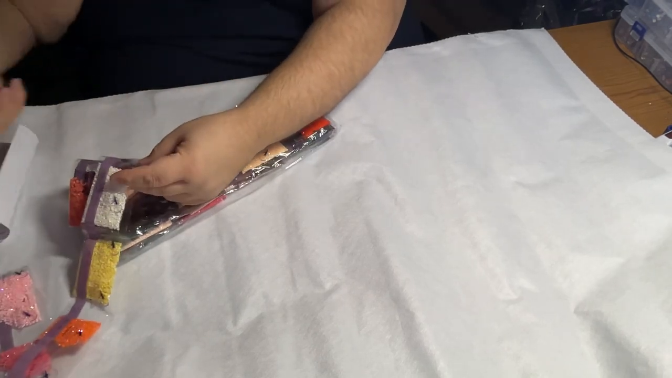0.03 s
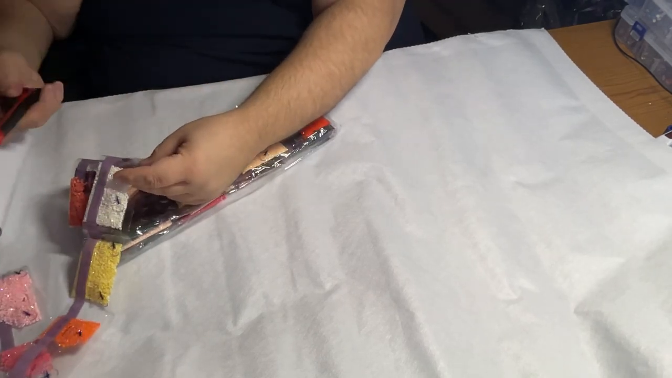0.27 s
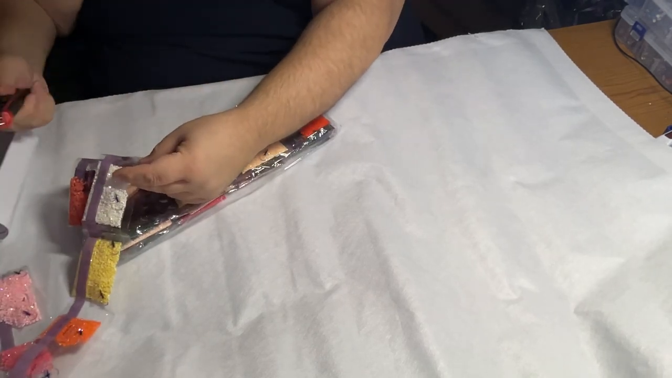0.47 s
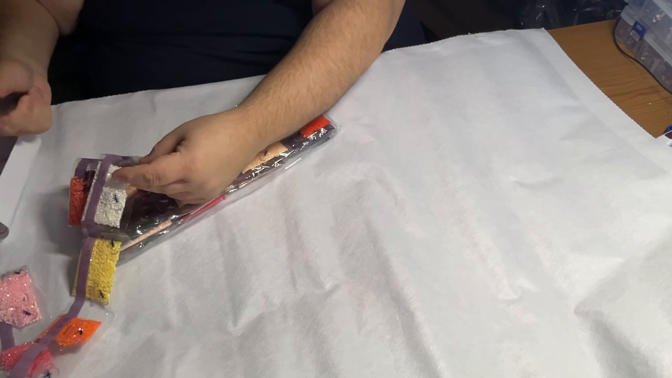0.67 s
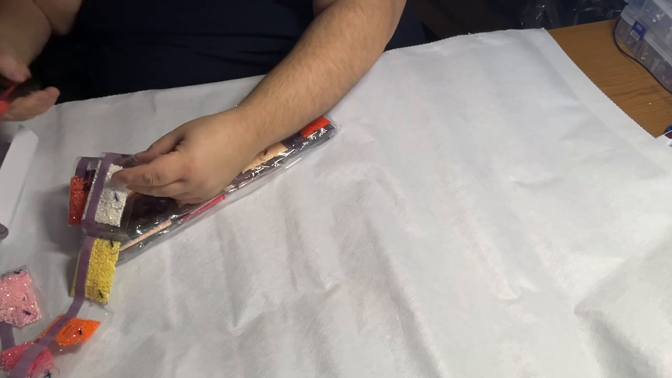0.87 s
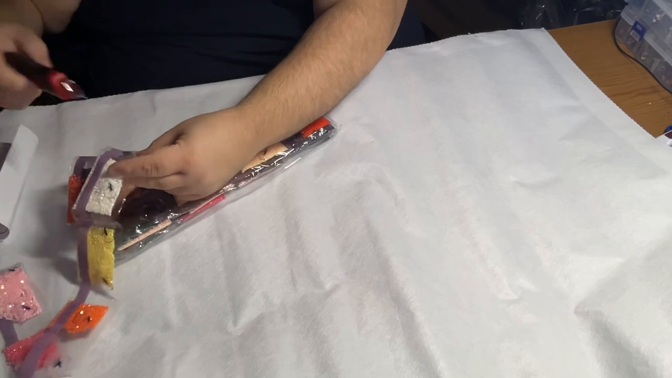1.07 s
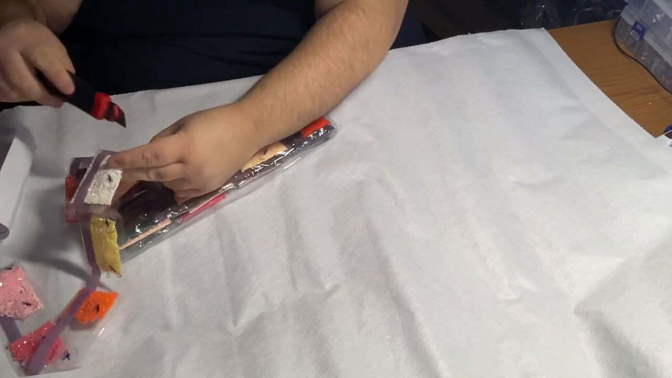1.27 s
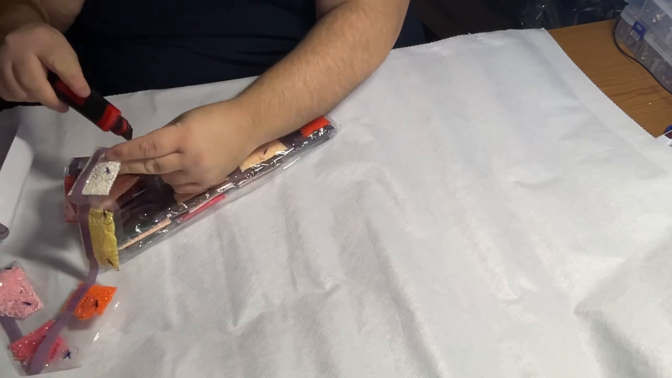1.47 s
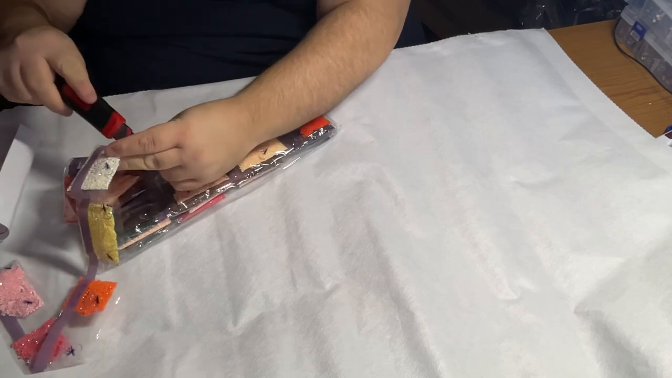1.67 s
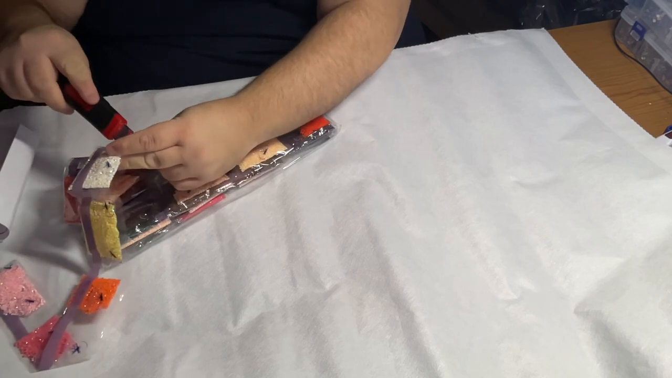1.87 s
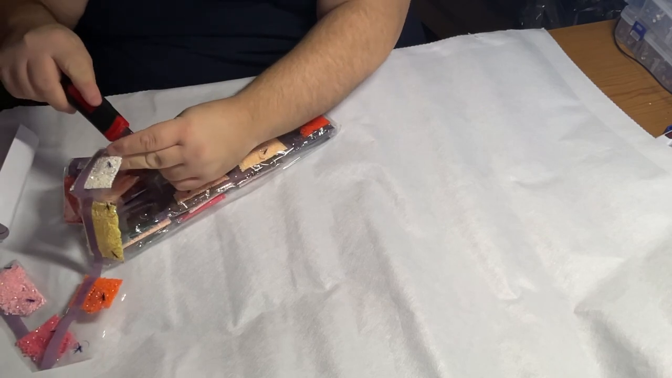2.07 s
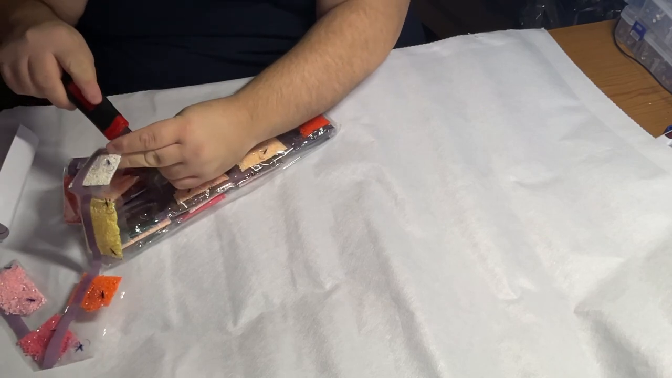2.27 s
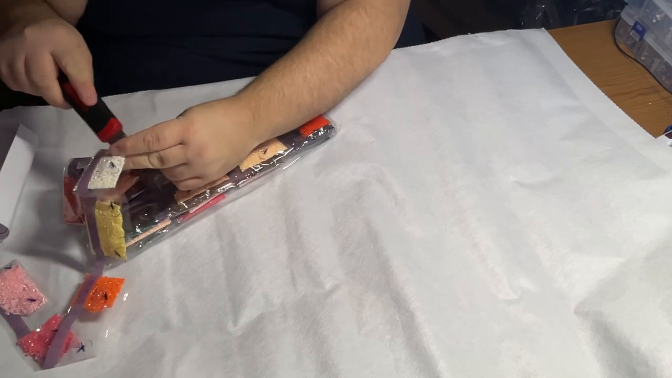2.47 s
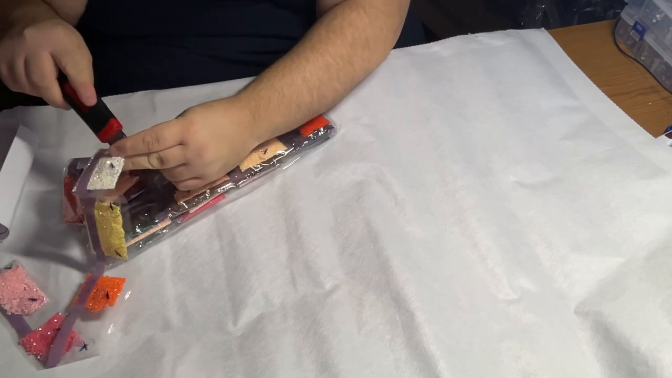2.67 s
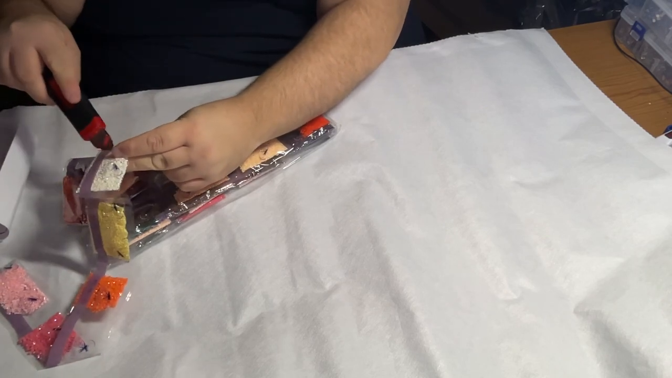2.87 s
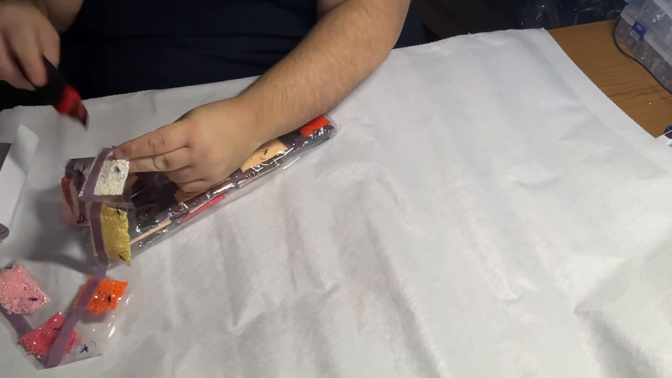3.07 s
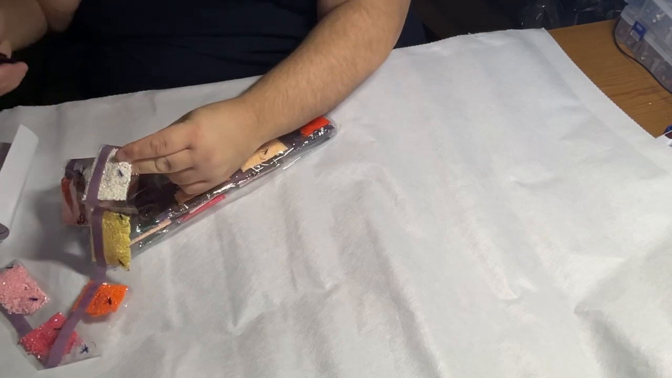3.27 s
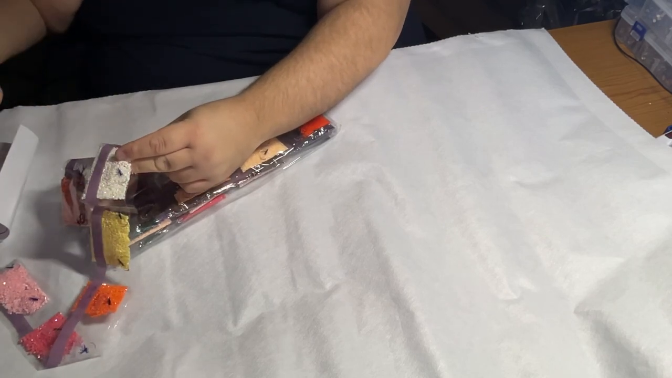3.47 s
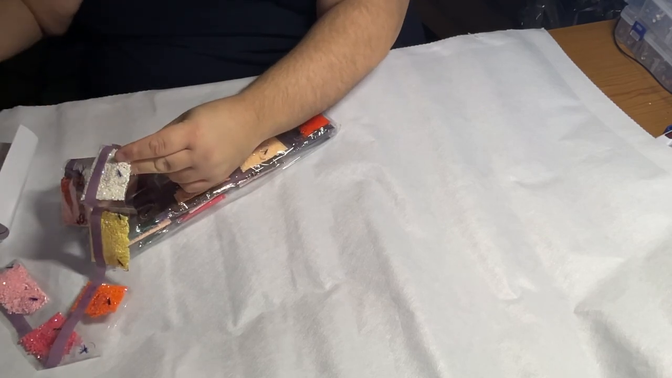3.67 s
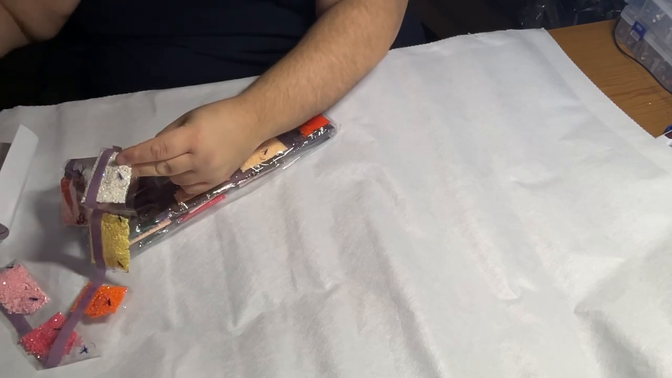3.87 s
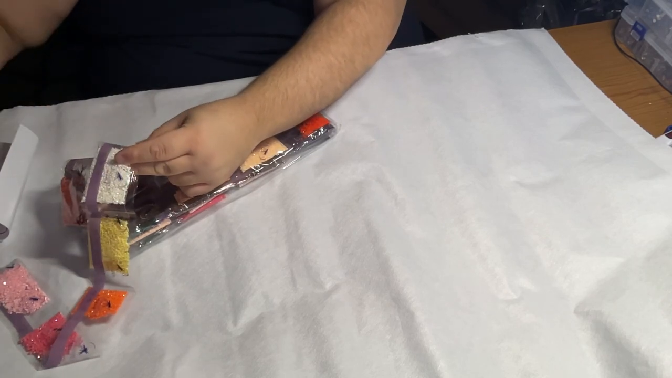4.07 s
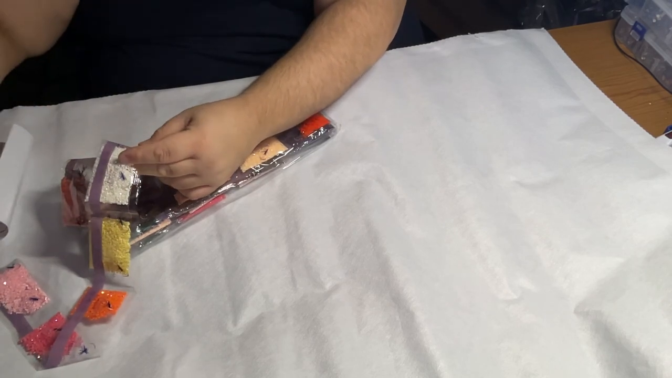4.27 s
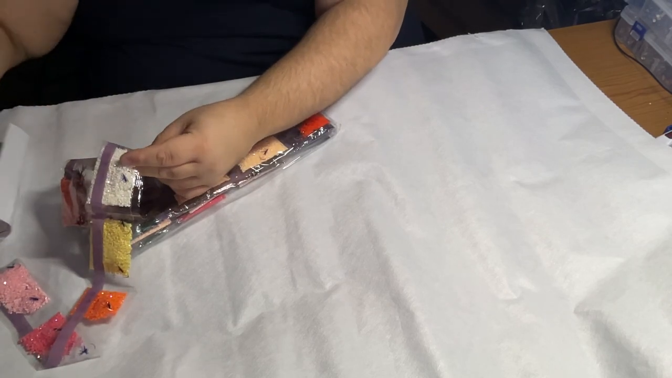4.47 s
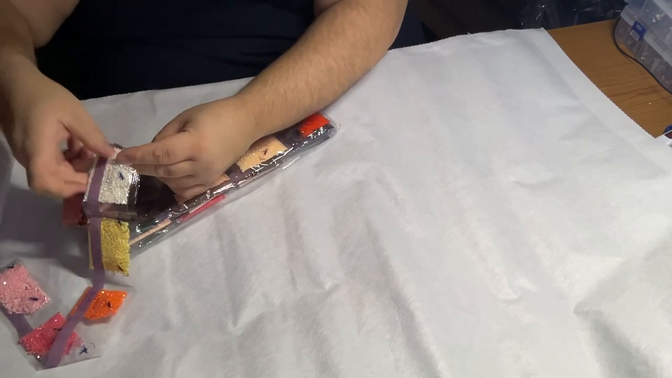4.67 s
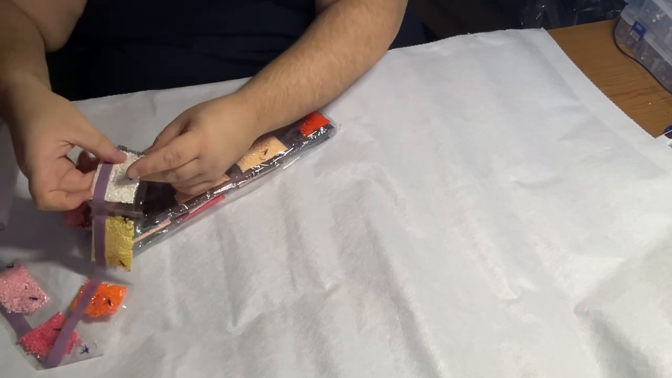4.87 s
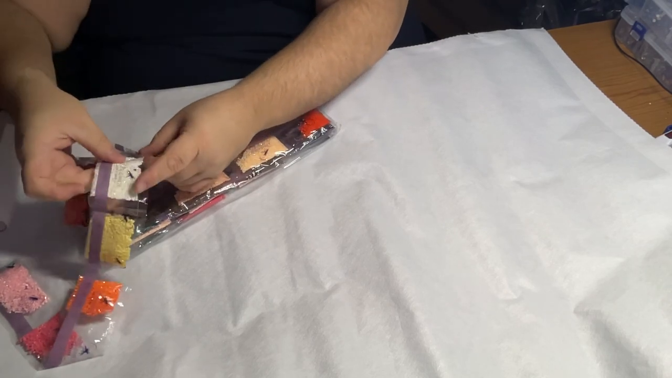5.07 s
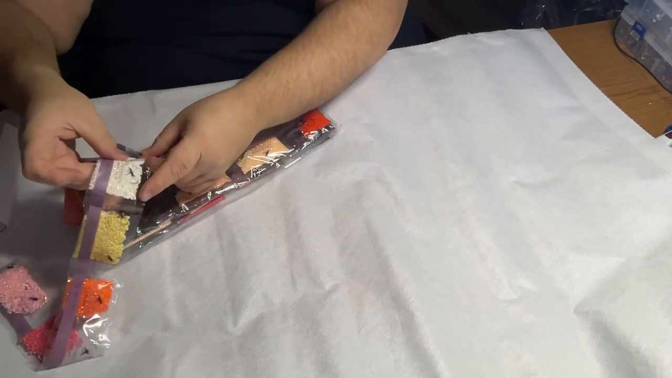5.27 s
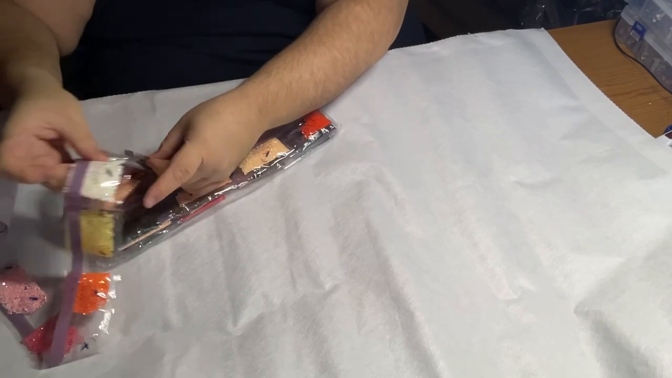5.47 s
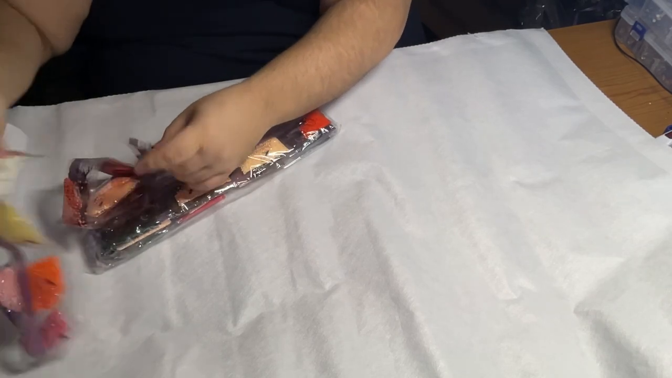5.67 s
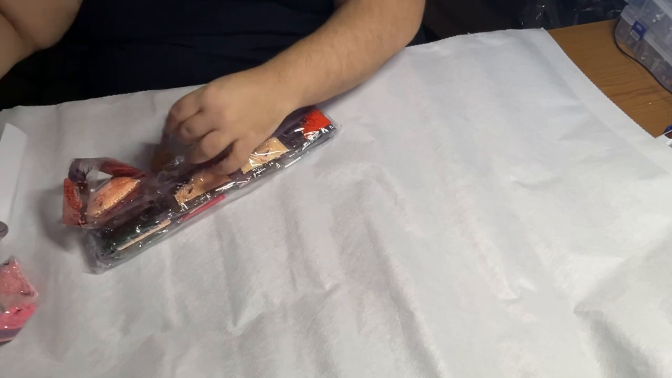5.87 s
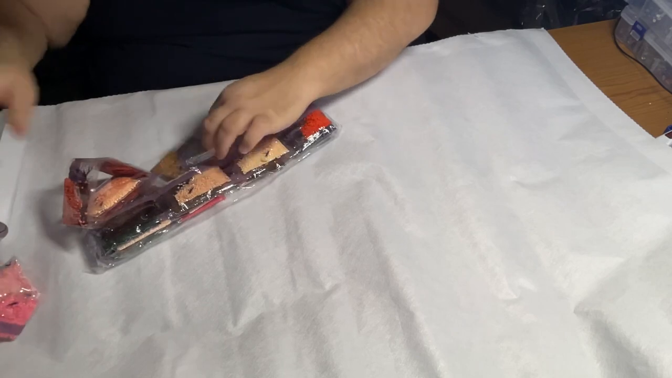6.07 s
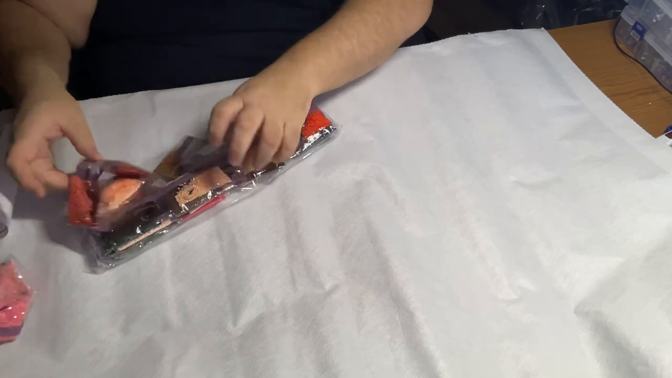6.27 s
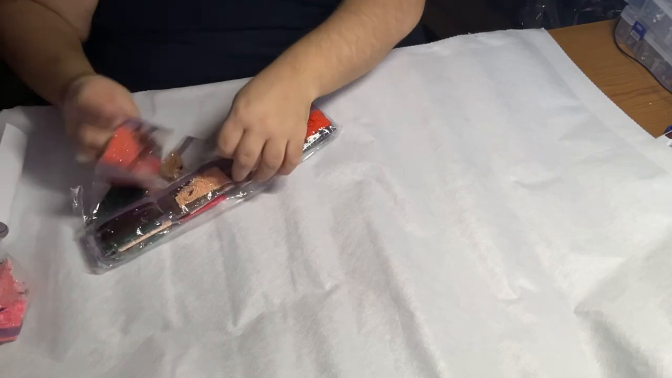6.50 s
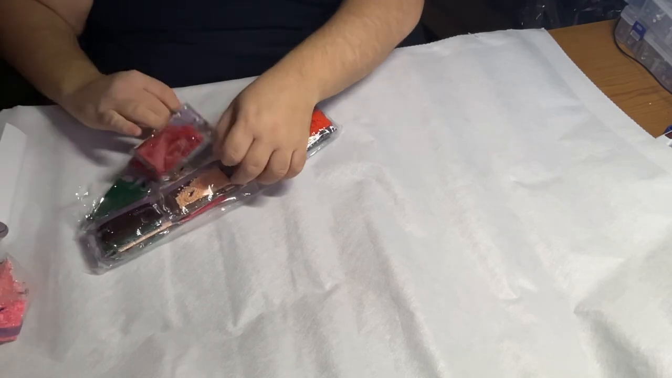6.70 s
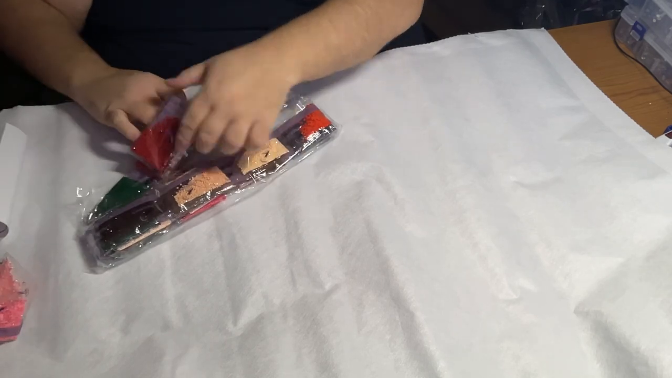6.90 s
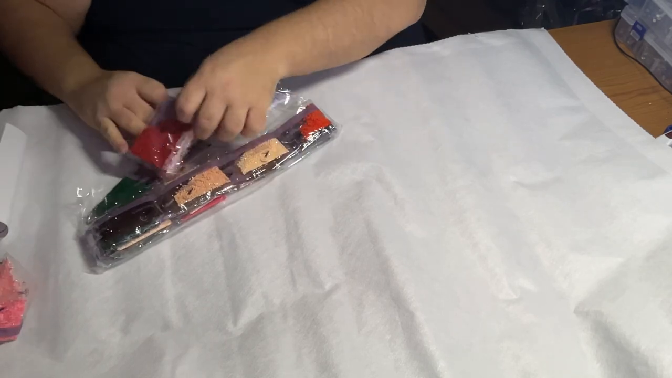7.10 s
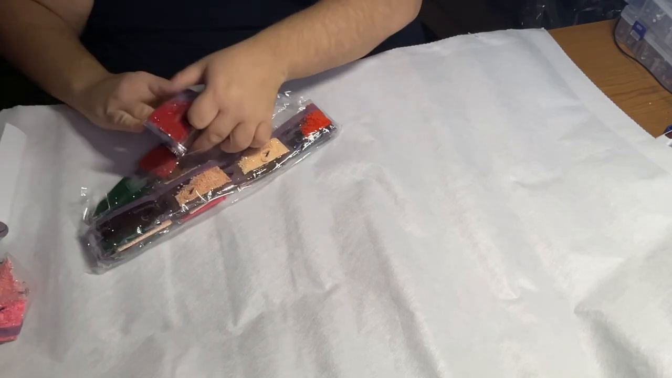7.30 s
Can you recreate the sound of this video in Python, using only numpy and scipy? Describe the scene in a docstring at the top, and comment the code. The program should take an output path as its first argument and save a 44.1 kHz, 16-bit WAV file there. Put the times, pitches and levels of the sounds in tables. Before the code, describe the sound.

A utility knife ratchets open, nicks thin plastic wrap, ratchets shut and clatters onto a table, then film crackles and rustles under busy hands.

```python
"""A knife ratchets out, plastic film nicks and rustles, the knife ratchets back and clatters down; then film crackles.
The place is a paper-covered table in a small room, where two hands open the wrap of a bundle of small bags.
Noise bursts make knife and creases, ringing modes the table, and flipping facets and air pockets the film.
A camera with two closely spaced microphone ports stands near: they hear partly alike sound, apart in phase and level.
A low steady noise and a faint hum lie behind everything."""
import sys
import numpy as np
from scipy import signal
from scipy.fft import rfft, irfft, next_fast_len
from scipy.io import wavfile
from scipy.ndimage import uniform_filter1d

SR = 44100
rng = np.random.default_rng(int(sys.argv[2]) if len(sys.argv) > 2 else 0)


def to_wav(sig):
    """Store sig (one row per channel, or 1-D mono) as 16-bit WAV at the path in sys.argv[1].

    Samples outside -1..1 are clipped; the rate is SR.
    """
    pcm = np.clip(np.atleast_2d(sig), -1, 1) * 32767
    pcm = np.round(pcm).astype(np.int16)
    wavfile.write(sys.argv[1], SR, pcm.T)  # frames by channels


N = 323694
TIME = np.arange(N) / SR  # [s]

# All levels are relative: colours are scaled to unit energy and scene() balances the layers.
# Background noise colour: (frequency [Hz], level [dB])
HUM_COLOUR = [(30, -41), (60, 2.5), (90, -2), (140, 1.5), (240, -6.5), (380, -15), (1150, -18.5),
              (2400, -19.5), (3600, -20.5), (8000, -59), (15500, -51)]
# Decay of the small room: (frequency [Hz], t60 [s])
ROOM_DECAY = [(150, 0.26), (1400, 0.18), (4000, 0.21), (9000, 0.17), (16000, 0.074)]
# Ringing of the table top: (frequency [Hz], level [dB], t60 [s])
TABLE_MODES = [(142, -2, 0.29), (183, -2, 0.27), (274, -0.5, 0.33), (392, 3.5, 0.17), (452, -2, 0.25),
               (553, -7, 0.2), (616, -6.5, 0.13)]
# Knife handle hits the table and rocks:
# (time [s], clack level [dB], rattle decay [s], treble tilt [dB per octave], table thump level [dB])
KNOCKS = [(4.1976, -7, 0.0023, 2.5, -9), (4.308, -19, 0.00096, -3.5, -38), (4.317, -24, 0.0031, -10, -33),
          (4.3366, -20.5, 0.0047, 1.5, -26), (4.3387, -18, 0.0047, 1.5, -5.5),
          (4.367, -14.5, 0.0014, -7, -21), (4.3867, -5, 0.0015, -4, -10.5), (4.408, -19, 0.0025, -10, -22),
          (4.434, -23.5, 0.0039, -6.5, -30)]
# Colour of the clacks: (frequency [Hz], level [dB])
KNOCK_COLOUR = [(200, -10.5), (560, -4), (900, -4), (1450, 1.5), (1720, -4), (2050, 0), (2600, -7),
                (3700, -6.5), (8000, -14), (15800, -25)]
# Slider snaps over one notch as the blade goes out: (time [s], level [dB], chatter decay [s])
BLADE_OUT = [(0.387, -10.5, 0.0016), (0.436, -12, 0.0015), (0.4865, -18, 0.0029), (0.54, -19, 0.0029),
             (0.61, -16, 0.0015)]
# The same as the blade goes back in: (time [s], level [dB], chatter decay [s])
BLADE_IN = [(3.565, -23, 0.0075), (3.62, -13.5, 0.0015), (3.661, -14.5, 0.0023), (3.692, -13.5, 0.0016),
            (3.719, -14, 0.0018), (3.86, -8.5, 0.0016)]
# Colour of the outward notches: (frequency [Hz], level [dB])
OUT_COLOUR = [(500, -32), (900, -23), (1300, -11.5), (2000, -10.5), (2700, -6.5), (3400, -1), (4100, -2),
              (4800, -8.5), (6000, -2.5), (8000, -6), (11000, -11), (13500, -4.5), (15800, -4.5)]
# Colour of the inward notches: (frequency [Hz], level [dB])
IN_COLOUR = [(500, -24.5), (900, -20), (1300, -0.5), (1800, -4), (3600, -4.5), (6000, -2.5), (8000, -3.5),
             (10500, -12.5), (13500, -7), (15800, -12)]
# Blade or fingers bump the bundle:
# (time [s], level [dB], hollow resonance [Hz], settling decay [s], dull thud relative to level [dB])
BUMPS = [(0.231, -39, 1150, 0.0016, -18), (0.805, -41.5, 1140, 0.0016, -17), (1.495, -42.5, 714, 0.0012, 2),
         (2.103, -40.5, 1340, 0.0015, -23), (2.2492, -39, 338, 0.0016, 8), (2.52, -35, 1460, 0.0019, -31),
         (2.646, -45.5, 645, 0.005, -16), (2.774, -37.5, 1270, 0.0025, -24), (2.904, -40.5, 710, 0.006, 5),
         (4.565, -37, 710, .009, -5), (6.011, -25, 1240, 0.0032, -14), (7.225, -41, 280, 0.0097, -10)]
# Dull colour of thuds and rubbing: (frequency [Hz], level [dB])
THUD_COLOUR = [(100, -7), (280, 1), (450, -3), (1200, 1), (2200, -4), (5000, -43)]
# Changing hold on the wrap: light while cutting, slight as the knife is put away, then firmer in surges:
# (time [s], effort [dB])
GRIP = [(0, -65), (1.35, -63.5), (1.65, -68), (3.0, -65.5), (3.35, -76), (4.1, -66.5), (4.56, -63.5),
        (4.65, -57.5), (5.28, -55.5), (5.68, -52), (5.95, -41.5), (6.22, -54.5), (6.7, -40.5), (6.9, -51.5),
        (7.05, -52), (7.34, -50.5)]
# A hand shifts, pinches or pulls the film:
# (start [s], length [s], effort [dB], rubbing on the bundle relative to effort [dB])
STROKES = [(0.883, 0.29, -55.5, -2.5), (4.626, 0.18, -49.5, -7), (4.878, 0.23, -52, -12),
           (5.742, 0.062, -40, -34), (6.045, 0.14, -41.5, -5.5), (6.246, 0.15, -43.5, -9),
           (6.469, 0.018, -40, -9), (6.577, 0.091, -38.5, -23), (6.94, 0.24, -41.5, -13),
           (7.224, 0.027, -34, -9), (7.319, 0.022, -41, -23)]
# Swishes: the blade scrapes along the wrap, then the bundle drops:
# (time of greatest level [s], level [dB], swell constant [s], fade constant [s], rubbing relative to level [dB])
SWISHES = [(2.452, -43.5, 0.017, 0.022, -1.5), (6.008, -23.5, 0.0096, 0.022, -20)]
# Creases buckle, faint to loud: (time [s], level [dB], treble sting relative to level [dB])
CRACKLES = [(0.034, -30, -25), (0.162, -30.5, -23), (0.274, -25, -23), (0.76, -37, 1), (0.939, -41, 1),
            (0.982, -27.5, -17), (1.045, -30, 4.5), (1.119, -23.5, -5), (1.131, -29, -8),
            (1.164, -25, -1.5), (1.585, -35, 2), (1.73, -31.5, -6), (1.976, -25, -14), (2.008, -34, -8),
            (2.068, -33.5, -10), (2.248, -27.5, -43), (2.369, -36, -1), (2.432, -26, -14),
            (2.53, -34.5, -24), (2.599, -31.5, -7), (2.644, -28.5, -15), (2.775, -26, -18),
            (2.862, -27.5, -20), (2.905, -18, -7), (2.949, -20.5, -7), (3.182, -27.5, -12),
            (4.509, -29.5, -3), (4.79, -29, -19), (4.916, -13, 0.5), (4.985, -28, -9), (5.004, -19.5, -13),
            (5.043, -24.5, -15), (5.059, -20, -3), (5.184, -28, 1.5), (5.362, -32, 6), (5.396, -16, -21),
            (5.401, -15, -14), (5.476, -19, -26), (5.502, -20.5, -8), (5.535, -18, -10), (5.572, -27, 4),
            (5.651, -21, -11), (5.679, -25, -3.5), (5.721, -16, -26), (5.771, -30, 7), (5.971, -21, -16),
            (6.011, -7, -23), (6.102, -18, 8), (6.109, -34, 7), (6.177, -20.5, -4), (6.236, -19, -7),
            (6.474, -23, 4), (6.487, -15.5, -5.5), (6.5725, -18, -19), (6.608, -19, -13), (6.669, -30, -19),
            (6.722, -22, -4), (6.819, -20.5, -14), (6.923, -17, -8), (7.016, -17.5, -15),
            (7.098, -22.5, -2), (7.117, -17, 4), (7.175, -17.5, -2), (7.219, -12.5, -9), (7.27, -24, 1.5),
            (7.326, -19.5, 4)]
# Colour of the film: (frequency [Hz], level [dB])
FILM_COLOUR = [(550, -13.5), (1200, -5), (1650, -8), (2050, -1), (2600, -2.5), (3500, -0.5), (4400, -2.5),
               (4900, -5.5), (5600, 2), (8000, -3.5), (10500, -10.5), (13000, -6), (15500, -8.5)]
# Thin top of a snap: (frequency [Hz], level [dB])
STING_COLOUR = [(5000, -8.5), (9000, 4), (14000, 2)]
# Likeness of the two microphone ports: (frequency [Hz], likeness [0 to 1])
PORT_LIKENESS = [(100, .98), (170, .95), (270, .76), (550, .68), (1300, .85), (2300, .7), (5000, .78),
                 (7500, .35), (12500, .96), (16000, .9)]
# Phase by which the left port leads: (frequency [Hz], lead [rad])
PORT_LEAD = [(100, 0), (520, -.6), (1100, -.1), (1600, .6), (2400, 2.6), (3500, 5.5), (4300, 7),
             (5000, 9.2), (7300, 10), (8700, 12.7), (13500, 16.2), (15500, 18.7)]
# Left port relative to the right: (frequency [Hz], level [dB])
PORT_BALANCE = [(60, .7), (280, 3.5), (600, 1.5), (1200, 2.6), (4500, 2.7), (5800, 4.5), (9000, 4.2),
                (11000, .5)]

HUM_DB, HUM_LINE_HZ, HUM_LINE_DB = -57.5, 237, -67.5  # background noise, and a faint hum at rms level
EDGE_HZ = 16200  # upper band limit
ROOM_HOLD_S = 0.045  # time between changes of the room's reflections
# Centres and widths of the table's dip and rebound after a landing
DIP_S, DIP_WIDTH_S, REBOUND_S, REBOUND_WIDTH_S = 0.0039, 0.001, 0.00773, 0.00098
STROKE_ATTACK_S, STROKE_RELEASE_S = 0.041, 0.028  # the film takes up the strain, then relaxes
FIRM_DB = -40  # effort of a firm grip
GRIP_RUB_DB, GRIP_RUB_SLOPE = -53, 0.42  # rubbing at a firm grip, and its dB per dB of effort
POCKET_HZ = 840, 1860  # largest and smallest air pockets under the film
PUCKER_PER_S, PUCKER_SPREAD_DB, PUCKER_DB = 60, 13, -13  # rate, scale of size spread, level relative to effort
# Chance creases at firm effort: rate, level, sting relative to level, and the spread of both levels
SMALL_PER_S, SMALL_DB, SMALL_STING_DB, SMALL_SPREAD_DB = 24, -29, -9, 4
SMALL_RATE_POWER, SMALL_DB_SLOPE = 0.22, 0.5  # a gentler hand makes them rarer and softer


def amp(db):
    """Turns decibels into gain."""
    return 10 ** (np.asarray(db) / 20)


def read(points, hz):
    """Reads a spectrum joined by straight lines over log frequency."""
    f, value = np.transpose(points)
    return np.interp(np.log(hz + 1), np.log(f + 1), value)


def evened(x):
    """Scales to rms 1."""
    return x / np.sqrt(np.mean(x ** 2) + 1e-20)


def levelled(x, width_hz=420):
    """Evens out the broad peaks and dips of a short noise's spectrum, keeping its energy."""
    size = x.shape[1]
    spectrum = rfft(x, 2 * size, axis=1)
    width = max(round(2 * size * width_hz / SR), 1)
    power = uniform_filter1d(abs(spectrum) ** 2, width, axis=1)
    flat = irfft(spectrum / np.sqrt(abs(power) + 1e-12), axis=1)[:, :size]
    return flat * np.linalg.norm(x, axis=1, keepdims=True) / np.linalg.norm(flat, axis=1, keepdims=True)


def add(mix, s, sound):
    """Mixes a sound in at time s."""
    part = mix[:, max(round(s * SR), 0):][:, :sound.shape[1]]
    part += sound[:, :part.shape[1]]


def colour(x, points, tilt_db=0, size=4096):
    """Filters causally with unit energy, falling away below the lowest point and above the band limit."""
    hz = abs(np.fft.fftfreq(size, 1 / SR))
    lowest_hz = points[0][0]
    gain = amp(read(points, hz) + tilt_db * np.log2(1 + hz / lowest_hz / 20))
    low_cut = np.hypot(1, (lowest_hz / (2 * hz + 1)) ** 2)
    high_cut = np.hypot(1, (hz / EDGE_HZ) ** 20)
    gain = evened(gain / low_cut / high_cut)
    # minimum phase: the filter's energy comes as early as it can
    taps = np.fft.ifft(np.exp(np.conj(signal.hilbert(np.log(gain + 1e-5))))).real
    return signal.oaconvolve(x, taps[None, :size // 2], axes=1)[:, :N]


def burst(decay_s, size=2600):
    """Makes a cluster of tiny impacts as noise that dies away from rms 1."""
    shape = np.exp(-np.arange(size) / SR / max(decay_s, 1e-4))
    noise = rng.standard_normal((2, size)) * shape
    return noise * np.linalg.norm(shape) / np.linalg.norm(noise, axis=1, keepdims=True)


def snap(decay_s, crack_db):
    """A sharp crack in the wave shared by both ports, with a burst around it."""
    sound = burst(decay_s)
    sound[0, 1] += amp(crack_db)
    return levelled(sound)


def hollow(hz, size=600):
    """A pocket of air rings for a few cycles, with unit energy."""
    cycles = hz * TIME[:size]
    ring = np.sin(2 * np.pi * cycles) * np.exp(-cycles)
    return ring[None] / np.linalg.norm(ring)


def background_hum():
    """Low coloured noise in the room, and a faint steady sine hum."""
    hum = np.sqrt(2) * amp(HUM_LINE_DB) * np.sin(2 * np.pi * HUM_LINE_HZ * TIME)
    return amp(HUM_DB) * colour(rng.standard_normal((2, N)), HUM_COLOUR) + hum


def room(x, wet_db, near_db, count=7, size=16000):
    """Quick scatter off table and hands, then a short tail; the pattern steps in a cycle for moving hands."""
    out, age = np.zeros((2, N)), TIME[:size]
    pose = TIME // ROOM_HOLD_S % count
    for k in range(count):
        taps = rng.standard_normal((2, size)) * (rng.random(size) < .2)
        hz, t, z = signal.stft(taps, SR, nperseg=256)
        decay = amp(-60 * t / read(ROOM_DECAY, hz)[:, None])
        tail = signal.istft(z * decay, SR, nperseg=256)[1][:, :size]
        tail *= np.clip(age / 0.0022 - 1, 0, 1)
        near = taps * np.exp(-age / 0.0018) * (age > .0006)
        early = levelled((age == 0) + amp(near_db) * near / np.linalg.norm(near[0]))
        echo = early + amp(wet_db) * tail / np.linalg.norm(tail[0])
        echo = signal.lfilter([.9, .1], [1], echo)  # paper and cloth soak up the top treble
        out += signal.oaconvolve(x * (pose == k), echo, axes=1)[:, :N]
    return out


def push(at_s, width_s, t):
    """The air moved by one dip and recovery of the table top."""
    u = (t - at_s) / width_s
    return (1 - 2 * u ** 2) * np.exp(-u ** 2)


def thumps(push_db, rebound_db, ring_db, size=13000):
    """Under each landing the table top answers alike: it dips, rebounds and rings on."""
    out, t = np.zeros((2, N)), TIME[:size]
    ring = sum(amp(db - 60 * t / t60) * np.sin(2 * np.pi * hz * t) for hz, db, t60 in TABLE_MODES)
    thump = amp(push_db) * push(DIP_S, DIP_WIDTH_S, t)
    thump += amp(rebound_db) * push(REBOUND_S, REBOUND_WIDTH_S, t)
    thump += amp(ring_db) * ring * np.minimum(t / REBOUND_S, 1)
    for s, *_, thump_db in KNOCKS:
        add(out, s, amp(thump_db) * np.array([thump, 0 * thump]))
    return out


def knocks(clack_db):
    """The handle lands end by end, each landing a crack and a brief rattle."""
    out = np.zeros((2, N))
    for s, db, rattle_s, tilt_db, _ in KNOCKS:
        clack = snap(rattle_s, 7)
        add(out, s + 0.0005, amp(db + clack_db) * colour(clack, KNOCK_COLOUR, tilt_db))
    return out


def ratchet(rows, points, level_db):
    """Each notch gives a hard snap and a brief chatter of the blade in its track."""
    out = np.zeros((2, N))
    for s, db, chatter_s in rows:
        notch = levelled(amp(-11.5) * snap(0.0023, 1.4) + amp(1.0) * burst(chatter_s))
        add(out, s + 0.00065, amp(db + level_db) * colour(notch, points))
    return out


def bumps(ring_db):
    """The packed bags shift under a bump: a dull thud and a hollow ring fade as they settle."""
    out = np.zeros((2, N))
    for s, db, hz, settle_s, dull_db in BUMPS:
        shift = levelled(burst(settle_s))
        add(out, s, amp(db + ring_db) * signal.fftconvolve(shift, hollow(hz), axes=1))
        add(out, s, amp(db + dull_db) * colour(shift, THUD_COLOUR))
    return out


def hands():
    """Gains for effort and rubbing: a changing grip plus strokes that rise, hold and relax."""
    grip_db = np.interp(TIME, *np.transpose(GRIP))
    work = amp(grip_db)
    rub = amp(GRIP_RUB_DB + GRIP_RUB_SLOPE * (grip_db - FIRM_DB))
    for start, length, db, rub_db in STROKES:
        rise = np.clip(1 + (TIME - start) / STROKE_ATTACK_S, 0, 1)
        relax = np.exp(-np.clip(TIME - start - length, 0, 1) / STROKE_RELEASE_S)
        stroke = amp(db) * rise * relax
        work, rub = np.hypot(work, stroke), np.hypot(rub, amp(rub_db) * stroke)
    return work, rub


def puckers(count=12):
    """Broad panels of film pop in and out, each over its own pocket of air."""
    size_db = PUCKER_SPREAD_DB * np.minimum(rng.exponential(1, N), 2)
    pops = (rng.random(N) < PUCKER_PER_S / SR) * amp(size_db)
    pops = pops * rng.choice([-1, 1], (2, N))
    panel = rng.integers(0, count, N)
    out = np.zeros((2, N))
    for k, hz in enumerate(np.geomspace(*POCKET_HZ, count)):
        out += signal.oaconvolve(pops * (panel == k), hollow(hz), axes=1)[:, :N]
    return evened(out)


def crinkle(per_s, spread_db, count=30, size=256):
    """Facets of film flip in little avalanches, each ringing for a few cycles; small flips are commonest."""
    out, t = np.zeros((2, N)), TIME[:size]
    clumps = amp(4 * evened(uniform_filter1d(rng.standard_normal(N), 350)))
    flipping = rng.random(N) < per_s * clumps / clumps.mean() / SR
    flip_size = amp(spread_db * np.minimum(rng.exponential(1, N), 2.8))
    flips = flipping * flip_size * rng.choice([-1, 1], N)
    # flips close in time ring at similar pitches, so the colour shifts from patch to patch
    patch = np.repeat(rng.random(N // size + 1), size)[:N]
    kind = ((patch + .35 * rng.random(N)) * count).astype(int) % count
    for k, hz in enumerate(np.linspace(900, 15500, count)):
        ring = np.sin(2 * np.pi * (hz * t + rng.random((2, 1)))) * np.exp(-t / 0.00049)
        facet = evened(ring) + 1.12 * evened(burst(0.00054, size=size))
        out += signal.oaconvolve((flips * (kind == k))[None], facet, axes=1)[:, :N]
    return evened(out)


def rustle(work, body, crinkle_db, slide_db, rub_db):
    """Handling drives crinkles, a hiss of film and a dull rubbing; harder work flips more facets."""
    swish, press = np.zeros(N), np.zeros(N)
    for at, db, swell_s, fade_s, low_db in SWISHES:
        stroke = amp(db) * np.exp(-abs(TIME - at) / np.where(TIME < at, swell_s, fade_s))
        swish += stroke
        press += amp(low_db) * stroke
    per_s = 170 * (work / work.max()) ** .38
    steady = np.sqrt(per_s.mean() / per_s)  # keeps the power in step with the work
    ticks = colour(amp(crinkle_db) * work * steady * crinkle(per_s, 3.6), FILM_COLOUR, 0.77)
    hiss = colour((amp(slide_db) * work + swish) * crinkle(4000, 4.8), FILM_COLOUR, -0.13)
    rubbing = colour((amp(rub_db) * body + press) * crinkle(900, 5.5), THUD_COLOUR)
    return ticks + hiss + rubbing


def small_creases(work):
    """Creases give way by chance, more often and louder with effort; gives rows like CRACKLES."""
    firmness = work / amp(FIRM_DB)
    at = np.flatnonzero(rng.random(N) < SMALL_PER_S * firmness ** SMALL_RATE_POWER / SR)
    size_db, sting_db = SMALL_SPREAD_DB * rng.standard_normal((N, 2))[at].T
    level_db = SMALL_DB + SMALL_DB_SLOPE * 20 * np.log10(firmness[at]) + size_db
    return list(zip(TIME[at], level_db, SMALL_STING_DB + sting_db))


def crackles(rows, snap_db, facet_db, pocket_db, sting_db):
    """Creases snap, each ringing a facet and the air pocket under it; gives snaps and thin treble stings."""
    snaps, stings = np.zeros((2, N)), np.zeros((2, N))
    for s, db, treble_db in rows:
        sound = snap(0.00071, 1.7) + amp(-12.0) * burst(0.0066)
        t, facet_hz = TIME[:sound.shape[1]], 1200 * 10 ** rng.random()
        sound[0] += amp(facet_db) * np.sin(2 * np.pi * facet_hz * t) * np.exp(-t / 0.00086)
        add(sound, 0, amp(pocket_db) * hollow(rng.uniform(*POCKET_HZ)))
        add(snaps, s + .0007, amp(db) * sound)
        add(stings, s + 0.0005, amp(db + treble_db) * burst(0.00031))
    return amp(snap_db) * colour(snaps, FILM_COLOUR), amp(sting_db) * colour(stings, STING_COLOUR)


def scene():
    """Sets knife and film in the room over its background; table thumps and stings arrive without reflections."""
    background = background_hum()
    table = thumps(push_db=-12.5, rebound_db=-13, ring_db=-26)
    knife = knocks(clack_db=-1.5)
    knife += ratchet(BLADE_OUT, OUT_COLOUR, -4.5) + ratchet(BLADE_IN, IN_COLOUR, -1.44)
    work, rub = hands()
    wrap = rustle(work, rub, crinkle_db=-2.0, slide_db=-1.5, rub_db=-3.0)
    wrap += amp(PUCKER_DB) * work * puckers()
    creases = CRACKLES + small_creases(work)
    snaps, stings = crackles(creases, snap_db=-4.5, facet_db=-1.0, pocket_db=-1.0, sting_db=3.5)
    film = room(wrap, wet_db=-4.5, near_db=-1)
    film += room(snaps + bumps(ring_db=0.5), wet_db=-5, near_db=-2)
    return background + table + room(knife, wet_db=-5.5, near_db=-2.5) + film + stings


def record(dry):
    """Row 0 is the left port's wave; the right port hears it blended with row 1, shifted and scaled."""
    size = next_fast_len(N + 4096)
    left, other = rfft(dry, size, axis=1)
    hz = np.fft.rfftfreq(size, 1 / SR)
    same = np.clip(read(PORT_LIKENESS, hz), -1, 1)
    blend = same * left + np.sqrt(1 - same ** 2) * other
    right = blend * np.exp(-1j * read(PORT_LEAD, hz)) / amp(read(PORT_BALANCE, hz))
    ports = irfft(np.array([left, right]), size, axis=1)[:, :N]
    band_limit = signal.firwin(201, EDGE_HZ, window=("kaiser", 9), fs=SR)
    return signal.oaconvolve(ports, band_limit[None], "same")


dry = scene()
out = record(dry)
to_wav(out)
```